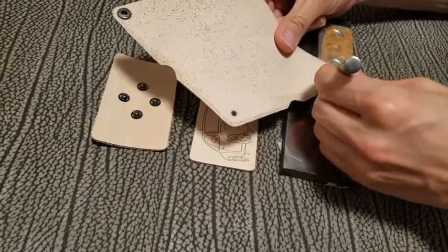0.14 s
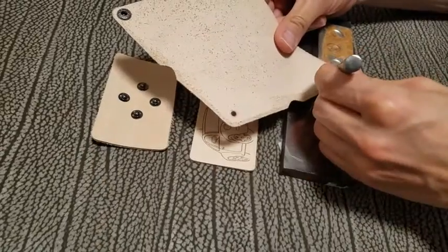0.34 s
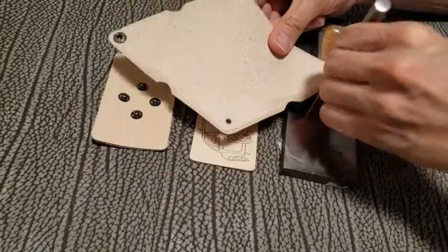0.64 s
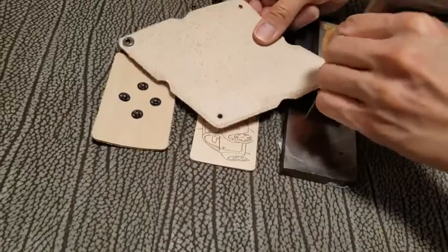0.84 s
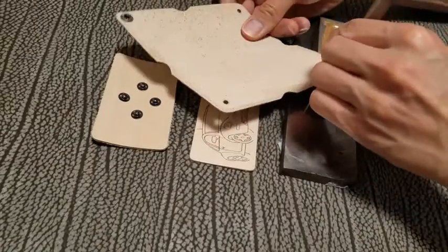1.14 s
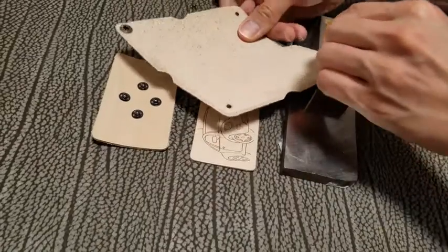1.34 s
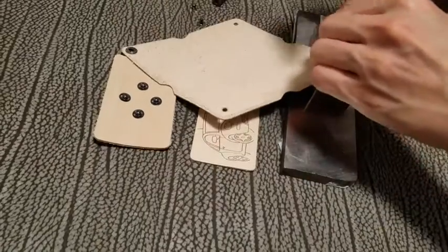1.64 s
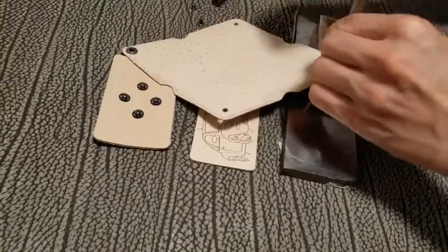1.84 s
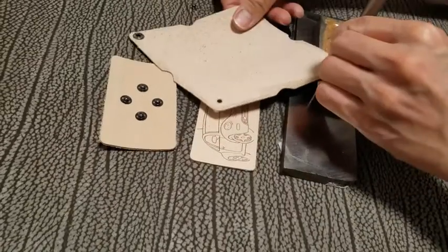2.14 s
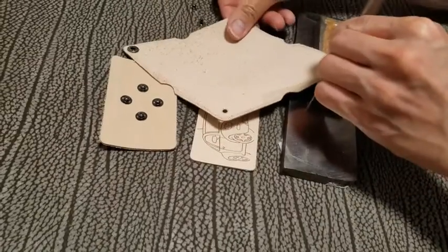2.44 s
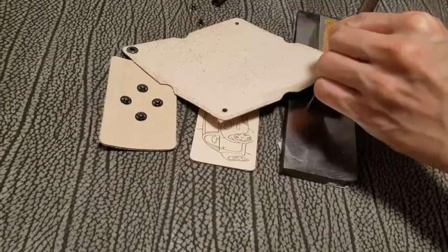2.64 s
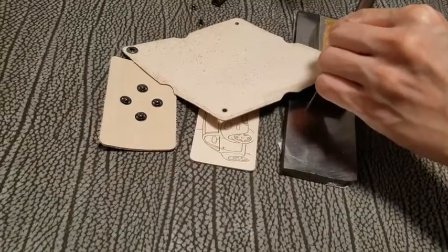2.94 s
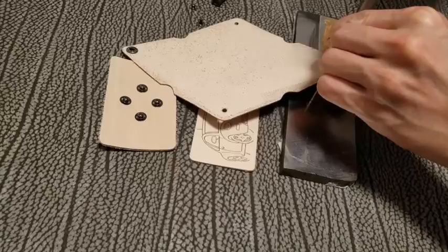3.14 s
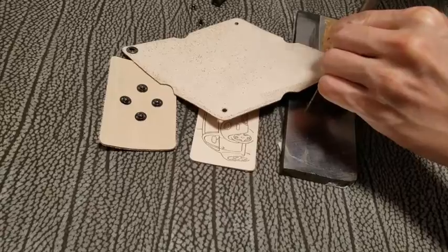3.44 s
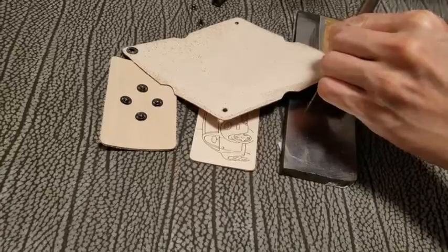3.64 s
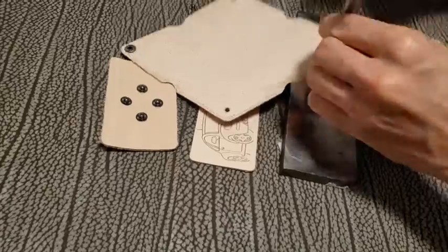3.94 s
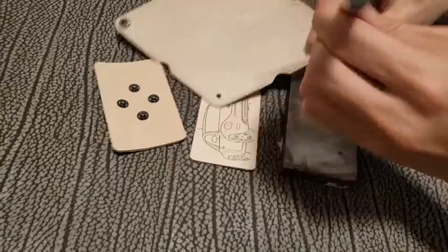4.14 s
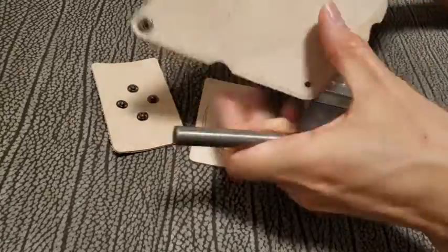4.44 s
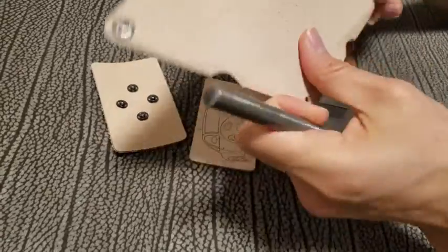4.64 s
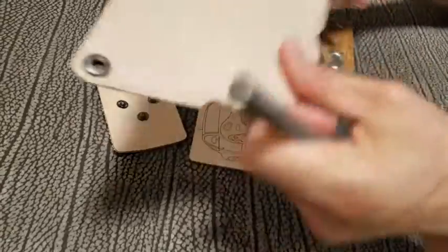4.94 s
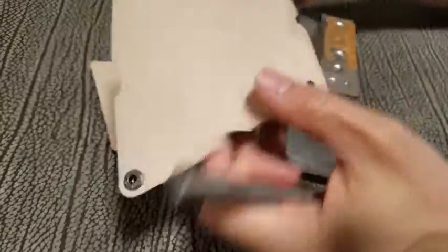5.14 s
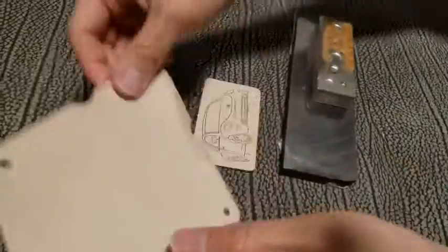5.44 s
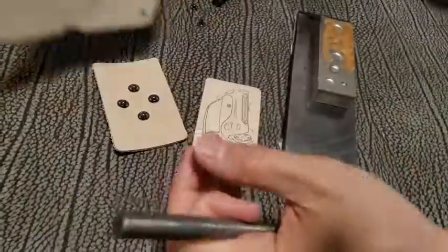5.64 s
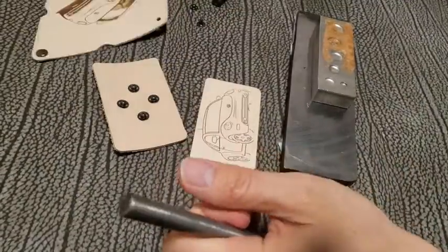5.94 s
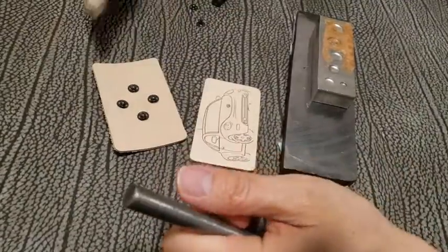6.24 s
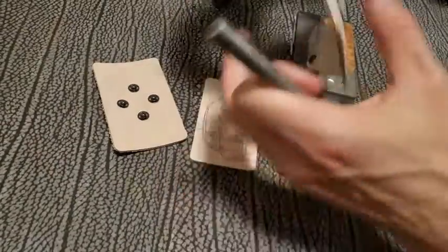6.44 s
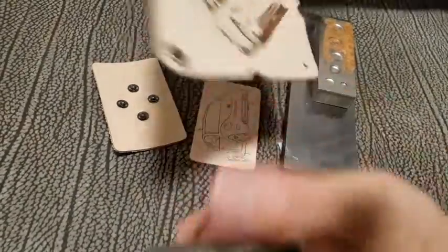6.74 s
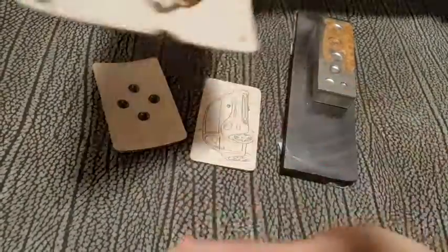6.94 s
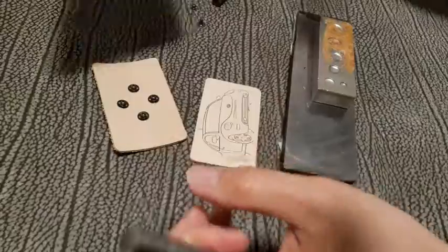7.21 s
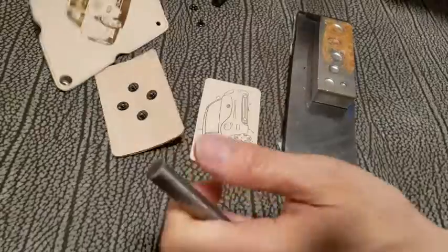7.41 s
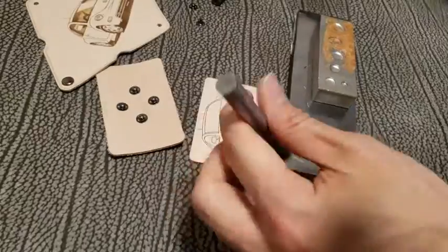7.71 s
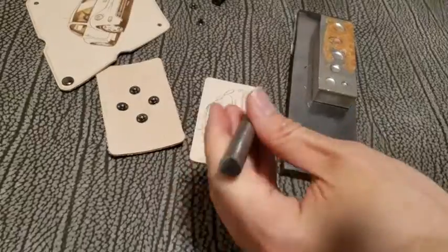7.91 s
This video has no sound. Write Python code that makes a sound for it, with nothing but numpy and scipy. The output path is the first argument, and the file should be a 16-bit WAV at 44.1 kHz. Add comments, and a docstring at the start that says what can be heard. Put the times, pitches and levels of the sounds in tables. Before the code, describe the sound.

A muffled low rumble swells under soft leather rubbing and dull table bumps. After a light warning tap, a very loud steel snap cracks against a small anvil block, then a double clank and a lower rebound knock, all dying quickly in a small dry room. Quieter handling follows: taps, fingers sliding on leather, a bright chink of small metal. Close microphone, slight hiss, briefly overloaded by the blows.

```python
"""Hard blows on a metal anvil block: steel snaps home once with a crack, the tool knocks back and bounces.
Each blow is a coloured push with dense echoes of a small quiet room, over dying steel, block and table modes.
Around the blows, light taps, chinks and soft bumps are smaller strikes of the same kind.
Leather rubs are clumped noise slips, shaped into a narrow scrape and a fine fizz.
Shaped noise makes the steady room air, the hiss and a muffled rumble that swells twice."""
import sys
import numpy as np
from scipy import signal
from scipy.fft import rfft, irfft, next_fast_len
from scipy.io import wavfile
from scipy.ndimage import minimum_filter1d

SR = 44100
rng = np.random.default_rng(int(sys.argv[2]) if len(sys.argv) > 2 else 0)


def waveform_to_disk(signal):
    """Save audio, clipped to [-1, 1], as 16-bit WAV at the path in sys.argv[1]."""
    frames = np.transpose(np.atleast_2d(signal))
    scaled = np.clip(frames, -1, 1) * 32767
    samples = np.round(scaled).astype(np.int16)
    wavfile.write(sys.argv[1], SR, samples)


N = 355880

# Levels in the tables are relative: a sound's own level and its colour add up in dB.
# steady room air: pitch_hz, density_db (per Hz)
AIR_COLOUR = [(25, -11.5), (55, -14), (150, -16), (240, -7.5), (370, -1.5), (430, -7.5), (650, -1.5),
              (880, -7), (1300, -6), (1800, -9), (2300, -14.5), (3200, -14.5), (7000, -23), (15800, -26)]
# left-right likeness of air and hiss: pitch_hz, likeness (-1 to 1)
AIR_ALIKE = [(60, 0.47), (300, 0.26), (700, 0.88), (1500, 0.36), (3000, 0.08), (15000, 0.027)]
# microphone hiss: pitch_hz, density_db (per Hz)
HISS_COLOUR = [(6000, -36), (7900, -21.5), (8300, 7.5), (15500, -1)]
# muffled rumble: pitch_hz, density_db (per Hz)
RUMBLE_COLOUR = [(25, -33), (70, -5.5), (170, -12), (250, 1.5), (310, -9), (365, 5), (440, -7), (580, -5),
                 (850, -17.5), (2000, -42)]
# swells of the rumble: start_s, fade_start_s, level_db
SWELLS = [(.1, 1.48, -59.5), (7.608, 8.073, -58)]
# how fast the room dies away: pitch_hz, t60_s
ROOM_DECAY = [(100, 0.056), (400, 0.16), (1000, 0.083), (3000, .1), (8000, 0.08), (15000, 0.066)]
# left-right likeness of strikes and rumble: pitch_hz, likeness (-1 to 1)
ROOM_ALIKE = [(70, 0.9), (160, .93), (800, .88), (1600, .5), (2800, -0.18), (5000, 0), (9000, -0.033),
              (15000, 0.18)]
# light taps of tool and leather: start_s, level_db, cutoff_hz, bright_edge_db
TAPS = [(.16, -16, 2330, -52), (2.078, -8.5, 4040, -27.5), (2.751, 2.5, 670, -35),
        (2.763, -14.5, 2850, -35), (3.2543, -4, 6140, -24), (4.156, -2, 3330, -23),
        (4.336, -15.5, 3000, -43), (5.938, -1.5, 6900, -40), (6.28, -15.5, 5000, -30),
        (6.54, -3.5, 2280, -30), (6.5817, -9, 5960, -10.5), (7.661, -18, 5010, -32)]
# colour of a tap: pitch_hz, level_db
TAP_COLOUR = [(60, -19), (300, -13.5), (750, -6), (1300, -3.5), (1800, -8.5), (3200, -8.5), (4500, -12),
              (7000, -4), (16000, -12)]
# the block answering a light tap: pitch_hz, level_db, t60_s
TAP_MODES = [(796, -50.5, 0.11), (1027, -56, 0.055)]
# spells of shifting grip: start_s, end_s
GRIP_SHIFTS = [(.6, 1.1), (5.25, 5.45), (6.15, 6.4), (7.4, 7.65)]
# leather and fingers sliding: start_s, length_s, level_db, scrape_hz, fizz_share_db
RUBS = [(.732, 0.083, -64, 2490, -8), (1.125, 0.14, -75, 4460, 7), (1.485, 0.097, -66.5, 3400, 0),
        (1.979, 0.082, -62.5, 3320, -9), (2.786, 0.078, -80.5, 3000, 17), (4.392, .046, -64, 2860, -3),
        (4.508, 0.083, -63.5, 2800, -4), (4.966, 0.1, -71, 2340, 6.5), (5.116, 0.012, -54.5, 2110, 7),
        (5.14, 0.11, -67.5, 2130, 2), (6.409, 0.033, -63, 3580, -10), (6.526, 0.06, -51.5, 3280, -1.5),
        (7.624, 0.069, -58.5, 3730, -8)]
# colour of the fizz before it is evened out: pitch_hz, level_db
FIZZ_COLOUR = [(2000, -27), (5000, -27.5), (7500, -27.5), (9000, -23.5), (15500, -30)]
# small metal parts touching: start_s, level_db, pitch_factor (ratio), scuff_s
CHINKS = [(0.78, -36, 1.2, .002), (2.0238, -28, 1.9, 0.0022), (3.2563, -13.5, 2.7, 0.00033),
          (4.157, -11, 1.36, 0.0018), (6.4881, 8.5, 0.993, 0.00098), (6.519, -10, 1.05, 0.00022),
          (6.609, -13, 1.1, .00066), (7.6598, -18.5, 0.83, 0.00059)]
# colour of a chink at pitch factor 1: pitch_hz, level_db
CHINK_COLOUR = [(200, -38), (1000, -26), (2000, -12), (2450, -1), (3000, -19), (3850, 0), (4500, -10),
                (5500, -11.5), (7900, -17), (8700, -7.5), (11500, -15), (15500, -23)]
# modes of a small part at pitch factor 1: pitch_hz, level_db, t60_s
PART_MODES = [(2523, -35.5, 0.023), (3870, -48, .05), (4580, -38, 0.022)]
# soft bumps on the table: start_s, level_db
BUMPS = [(1.380, -3), (1.44, 6), (2.754, -5.5)]
# colour of a bump: pitch_hz, level_db
BUMP_COLOUR = [(25, -23), (70, -10), (120, -3.5), (260, -3), (400, -21), (1000, -53)]
# hard blows: start_s, body_db, contact_cutoff_hz, low_thump_db, steel_crack_db, block_ring_db,
# punch_clank_db, rocking_db
KNOCKS = [(3.2533, 9.5, 860, 0.5, -24, -35, -50, -39), (3.523, 24, 3193, 30, 18.5, -7, -33, -36),
          (3.8374, 22, 1147, -6.5, -34.5, -15.5, -37.5, -47), (3.8480, 27, 4630, -1.5, -13.5, -4, -5, -37),
          (3.9198, 15.5, 2560, 12.5, -14.5, -25, -32, -12)]
# colour of a blow's body: pitch_hz, level_db
BODY_COLOUR = [(60, -28), (200, -19), (390, -7.5), (520, -6), (720, 3.5), (1000, 1), (1250, -4),
               (1550, -1.5), (2000, -7), (3200, -7.5), (5000, -10), (16000, -16)]
# colour of the low thump: pitch_hz, level_db
THUMP_COLOUR = [(25, -18), (45, -14.5), (70, -19.5), (150, -22.5), (185, -13.5), (230, -1), (300, -10),
                (480, 2), (900, -19), (3000, -59.5)]
# colour of the steel crack, also the bright edge of a tap: pitch_hz, level_db
CRACK_COLOUR = [(300, -29), (2000, -9), (3400, 6), (4300, -2), (6000, -4), (7500, -4.5), (8600, -1.5),
                (11500, -3), (15500, -4.5)]
# block and table ringing together: pitch_hz, level_db, t60_s
BLOCK_MODES = [(231, -27, 0.094), (410, -13, 0.13), (482, -17, 0.089), (630.5, -19, 0.12), (700, -7, 0.13),
               (764, 5.5, 0.088), (785, -13, 0.15), (896, -21.5, 0.071), (952, -18, 0.16),
               (1750, -21.5, 0.13)]
# the steel tool, its last pair singing on faintly: pitch_hz, level_db, t60_s
STEEL_MODES = [(1516, -5, .07), (2290, -4, 0.05), (3183, 2, 0.086), (3360, -1, 0.063), (3525, 3, 0.06),
               (3730, -1, 0.05), (4680, -3, 0.06), (8510, 0, 0.08), (8683, -6, .06), (10244, 5, .06),
               (12750, 0, .08), (13435, -4, .09), (14288, -3, .08), (3168, -25, .36), (3257, -28, .36)]
# the table top, rung by the thump: pitch_hz, level_db, t60_s
TABLE_MODES = [(119.1, -65, 0.25), (198, -66, .55), (227, -49.5, .12), (406, -50, .1), (333.6, -60, 0.11),
               (458, -46, 0.067), (556, -51, 0.15), (573, -81, .7)]
# the punch clanking against the block: pitch_hz, level_db, t60_s
PUNCH_MODES = [(1594, 0.5, 0.061), (1723, -13.5, 0.1), (2818, -10.5, .06), (2970, -14, .07)]
# the block rocking loose on the table: pitch_hz, level_db, t60_s
ROCKING_MODES = [(427, -10.5, .14), (668, -6.5, .11), (790, 1, 0.14)]

AIR_DB, HISS_DB = -63, -75
SWELL_RISE_S, SWELL_FALL_S = 0.44, 0.29
# a soft tap scuffs for longer: its longest scuff, and the cut-off that halves it
SCUFF_S, SCUFF_HZ = 0.0028, 3900
TAP_ROOM_DB, CHINK_ROOM_DB = -3.5, -9.5
# each faint stroke of the fingers; its scrape pitch is scattered around FIDGET_HZ
FIDGET_S, FIDGET_DB, FIDGET_HZ, FIDGET_FIZZ_DB = 0.16, -79, 3400, 4.5
STEEL_RING_DB = -37  # relative to the crack
# a blow that shakes the whole table sends more into the room: dB, and dB per dB of thump
KNOCK_ROOM_DB, ROOM_PER_THUMP = -7.5, 0.2
EDGE_HZ = 16100  # upper band limit
T = np.arange(SR * 3 // 4) / SR  # seconds since a sound began
HZ = np.fft.rfftfreq(4096, 1 / SR)


def amp(db):
    """Decibels to gain."""
    return 10 ** (np.asarray(db) / 20)


def read(points, hz):
    """A table's value at hz, on a log-frequency axis."""
    f, value = np.transpose(points)
    return np.interp(np.log(hz + 1), np.log(f), value)


def evened(x):
    """Scales to rms 1."""
    return x / np.sqrt(np.mean(x ** 2) + 1e-20)


def add(mix, s, sound):
    """Lays a stereo sound into the mix at time s."""
    part = mix[:, round(s * SR):][:, :sound.shape[-1]]
    part += sound[..., :part.shape[1]]


def paired(x, alike):
    """Blends two unrelated signals so that left and right agree as much as the table says."""
    a, b = rfft(x)
    likeness = np.clip(read(alike, np.fft.rfftfreq(x.shape[1], 1 / SR)), -.999, .999)
    mid = a * np.sqrt((1 + likeness) / 2)
    side = b * np.sqrt((1 - likeness) / 2)
    return irfft([mid + side, mid - side], x.shape[1])


def noise(colour, alike):
    """Steady stereo noise of rms 1 with the given spectrum."""
    size = next_fast_len(N, True)
    white = rfft(paired(rng.standard_normal((2, size)), alike))
    gain = amp(read(colour, np.fft.rfftfreq(size, 1 / SR)))
    return evened(irfft(white * gain, size)[:, :N])


def air_and_hiss():
    """Room air and microphone hiss: two steady noises, each with its own spectrum."""
    air = amp(AIR_DB) * noise(AIR_COLOUR, AIR_ALIKE)
    hiss = amp(HISS_DB) * noise(HISS_COLOUR, AIR_ALIKE)
    return air + hiss


def rumble():
    """Muffled noise that rises, holds and fades in straight lines."""
    t = np.arange(N) / SR
    swell = np.zeros(N)
    for start, fade, db in SWELLS:
        rise = (t - start) / SWELL_RISE_S
        fall = 1 - (t - fade) / SWELL_FALL_S
        swell += amp(db) * np.clip(np.minimum(rise, fall), 0, 1)
    return swell * noise(RUMBLE_COLOUR, ROOM_ALIKE)


def contact(cut_hz, steep=4.4):
    """A softer, longer contact passes less treble."""
    return 1 / np.sqrt(1 + (HZ / cut_hz) ** (2 * steep))


def causal_filter(colour):
    """Gives a colour the phase of a real impact: nothing sounds before the contact."""
    mirrored = np.r_[colour, colour[-2:0:-1]]
    log_gain = np.log(np.maximum(mirrored, colour.max() * 1e-4))
    return np.fft.ifft(np.exp(signal.hilbert(log_gain).conj())).real


def strike(colour, room_db, edge_s, grit, wall_s=0.0028, echo_s=0.0085, echo_db=-12):
    """A sharp push with a gritty edge, then the room's dense echoes, all in the given colour."""
    t = T[:len(T) // 2]
    grains, echoes = rng.standard_normal((2, 2, len(t)))
    edge = paired(grains, ROOM_ALIKE) * np.sqrt(t) * np.exp(-t / edge_s)
    direct = (t == 0) + grit * edge / np.linalg.norm(edge[0])
    direct = direct / np.linalg.norm(direct[0])
    # each band of the echoes dies at its own rate
    hz, when, z = signal.stft(paired(echoes, ROOM_ALIKE), SR, nperseg=256)
    decay = amp(-60 * when / read(ROOM_DECAY, hz)[:, None])
    tail = signal.istft(z * decay, SR, nperseg=256)[1][:, :len(t)]
    tail *= 1 - np.exp(-(t / wall_s) ** 2)  # the nearest surfaces answer after a few ms
    both = direct + amp(room_db) * tail / np.linalg.norm(tail[0])
    add(both, echo_s, amp(echo_db + room_db) * direct)  # one wall stands out
    both = both / np.linalg.norm(both[0])
    return signal.fftconvolve(both, causal_filter(colour)[None], axes=1)


def ring(modes, rise_s=0.003, spread_hz=3400):
    """Dying modes; the short waves reach the two microphones out of step."""
    hz, db, t60 = np.transpose(modes)[:, :, None]
    skew = rng.choice([-1, 1], hz.shape) * np.minimum(hz / spread_hz, 1) * np.pi / 4
    fade = amp(db - 60 * T / t60) * (1 - np.exp(-T / rise_s))
    channels = [(fade * np.sin(2 * np.pi * hz * T + side * skew)).sum(0) for side in (-1, 1)]
    return np.array(channels)


def taps():
    """Light contacts of tool and leather: soft ones are duller and scuff longer; the block answers."""
    out = np.zeros((2, N))
    for s, db, cut_hz, edge_db in TAPS:
        body = amp(db + read(TAP_COLOUR, HZ)) * contact(cut_hz)
        bright = amp(edge_db + read(CRACK_COLOUR, HZ))
        scuff_s = SCUFF_S / (1 + (cut_hz / SCUFF_HZ) ** 2.6)
        push = strike(np.hypot(body, bright), TAP_ROOM_DB, scuff_s, grit=3.3, echo_s=0.0027, echo_db=-9)
        add(out, s, push)
        add(out, s, amp(db) * ring(TAP_MODES, rise_s=0.0066))
    return out


def fidgets(count=3, spread_octaves=0.94):
    """A few faint strokes of the fingers, scattered through each shift of the grip."""
    strokes = []
    for start, end in GRIP_SHIFTS:
        for k, (when, pitch) in enumerate(rng.random((count, 2))):
            s = start + (k + when) / count * (end - start - FIDGET_S)
            scrape_hz = FIDGET_HZ * 2 ** (spread_octaves * (2 * pitch - 1))
            strokes.append((s, FIDGET_S, FIDGET_DB, scrape_hz, FIDGET_FIZZ_DB))
    return strokes


def rubs(grain_db=3, clump_db=6.0, clump_s=0.0018, width_octaves=0.28):
    """Sliding leather catches in tiny uneven slips that come in clumps: a narrow scrape, a fine fizz."""
    out = np.zeros((2, N))
    for s, length, db, scrape_hz, fizz_db in list(RUBS) + fidgets():
        count = round(length * SR)
        clumps = np.interp(T, np.arange(400) * clump_s, rng.standard_normal(400))
        grains = rng.standard_normal((2, len(T)))
        sizes = np.minimum(rng.exponential(1, len(T)), 4)
        slips = grains * amp(grain_db * sizes + clump_db * clumps)
        z, hz = rfft(slips[:, :count], count), np.fft.rfftfreq(count, 1 / SR)
        octaves_off = np.log2((hz + 1) / scrape_hz)
        scrape = evened(irfft(z / (1 + (octaves_off / width_octaves) ** 2), count))
        fizz = evened(irfft(z * amp(read(FIZZ_COLOUR, hz)), count))
        stroke = np.sin(np.linspace(0, np.pi, count))
        add(out, s, amp(db) * (scrape + amp(fizz_db) * fizz) * stroke)
    return out


def chinks():
    """Small metal parts touch with a gritty scuff and a short ring, both moved by the part's pitch."""
    out = np.zeros((2, N))
    for s, db, pitch, scuff_s in CHINKS:
        colour = amp(db + read(CHINK_COLOUR, HZ / pitch))
        add(out, s, strike(colour, CHINK_ROOM_DB, scuff_s, grit=5.0))
        add(out, s, amp(db) * ring(np.multiply(PART_MODES, [pitch, 1, 1]), rise_s=0.00025))
    return out


def bumps():
    """Soft bumps push the table and leave mostly low frequencies."""
    out = np.zeros((2, N))
    for s, db in BUMPS:
        add(out, s, strike(amp(db + read(BUMP_COLOUR, HZ)), room_db=1, edge_s=0.0006, grit=0.79))
    return out


def overtones(db=-16, count=70):
    """The crowd of weaker, short-lived steel modes around the main ones."""
    place, size, life = rng.random((count, 3)).T
    lowest_hz = STEEL_MODES[1][0]
    hz = lowest_hz + place * (EDGE_HZ - lowest_hz)
    t60 = .04 + .035 * life
    return np.c_[hz, db - 10 * size, t60]


def knocks():
    """Each blow thuds through the block into the table, cracks in the steel and sets them all ringing."""
    out = np.zeros((2, N))
    block = ring(BLOCK_MODES, rise_s=0.005)
    steel = ring(np.r_[STEEL_MODES, overtones()], rise_s=0.0018)
    table = ring(TABLE_MODES, rise_s=0.0022)
    punch = ring(PUNCH_MODES, rise_s=0.0022)
    rocking = ring(ROCKING_MODES, rise_s=0.035)
    for s, body_db, cut_hz, thump_db, crack_db, block_db, clank_db, rocking_db in KNOCKS:
        body = amp(body_db + read(BODY_COLOUR, HZ)) * contact(cut_hz)
        thump = amp(thump_db + read(THUMP_COLOUR, HZ))
        room_db = KNOCK_ROOM_DB + ROOM_PER_THUMP * thump_db
        thud = strike(np.hypot(body, thump), room_db, edge_s=0.0018, grit=1.0, wall_s=0.0077, echo_db=-6.5)
        add(out, s, thud)
        crack = amp(crack_db + read(CRACK_COLOUR, HZ))
        add(out, s, strike(crack, room_db=5.0, edge_s=0.0009, grit=4.7))
        add(out, s, amp(block_db) * block)
        add(out, s, amp(crack_db + STEEL_RING_DB) * steel)  # the steel rings in step with its crack
        add(out, s, amp(thump_db) * table)
        add(out, s, amp(clank_db) * punch + amp(rocking_db) * rocking)
    return out


def scene():
    """Everything heard at the work table."""
    return air_and_hiss() + rumble() + taps() + rubs() + chinks() + bumps() + knocks()


def lagged(x, time_s):
    """Follows x with a delay, like a charging capacitor."""
    r = np.exp(-1 / (time_s * SR))
    return signal.lfilter([1 - r], [1, -r], x)


def record(dry, threshold_db=-22, depth_db=7, attack_s=0.0049, hold_s=0.33, release_s=0.046):
    """Gain control, most sensitive to treble, ducks after a hard crack; then overload and the band limit."""
    slope = np.diff(dry, prepend=0)  # favours treble
    treble_power = lagged((slope ** 2).mean(0), attack_s)
    treble_db = 10 * np.log10(treble_power + 1e-12)
    over_db = np.clip(2 * (treble_db - threshold_db), 0, depth_db)
    hold = round(hold_s * SR) // 2
    held_db = -minimum_filter1d(-over_db, 2 * hold + 1, origin=hold)  # largest cut of the last hold_s
    released_db = np.maximum(held_db, lagged(held_db, release_s))
    cut_db = lagged(released_db, attack_s)  # the first peak slips through
    loud = np.tanh(dry * amp(-cut_db))
    band = signal.firwin(401, EDGE_HZ, window=("kaiser", 9), fs=SR)
    return signal.oaconvolve(loud, band[None], "same")


dry = scene()
out = record(dry)
waveform_to_disk(out)
```